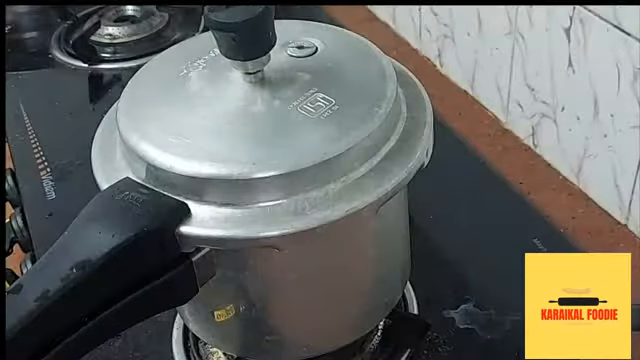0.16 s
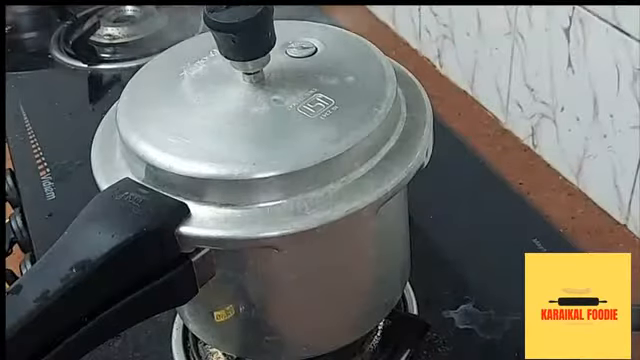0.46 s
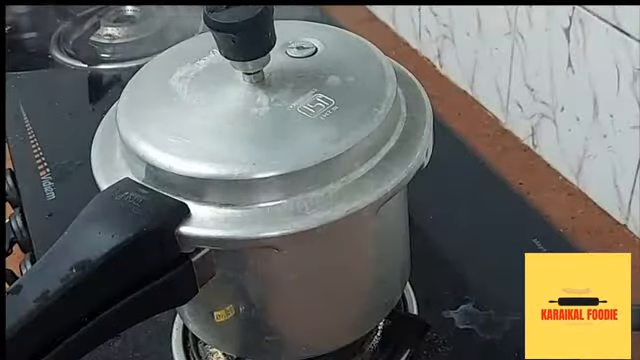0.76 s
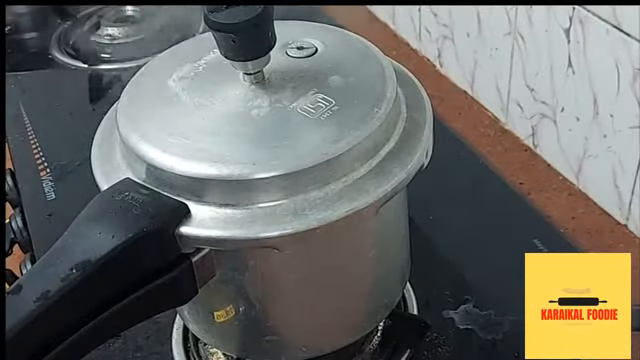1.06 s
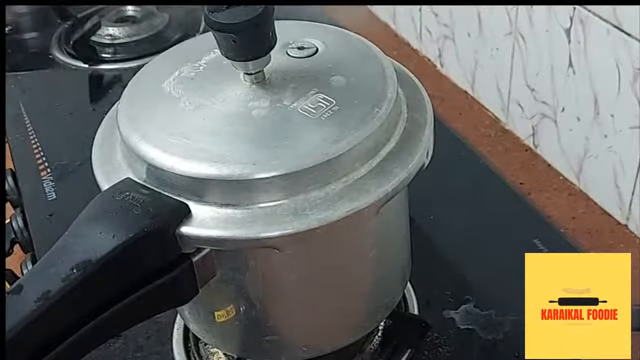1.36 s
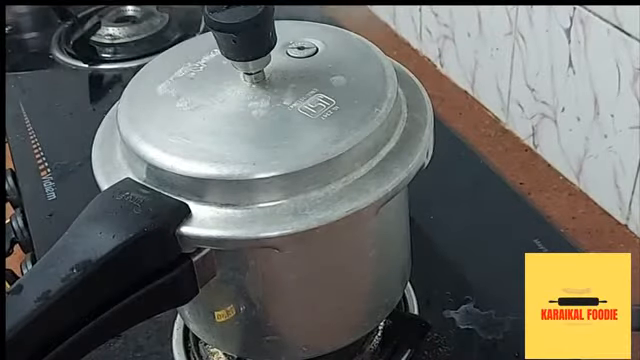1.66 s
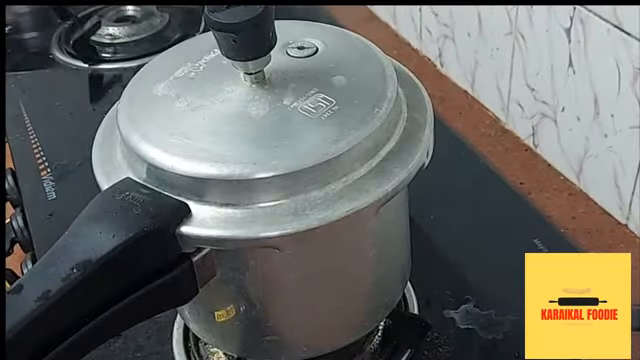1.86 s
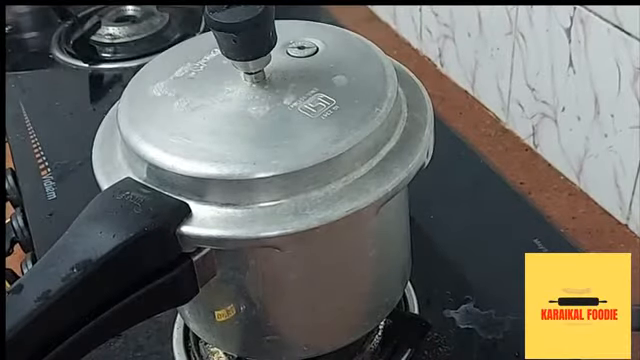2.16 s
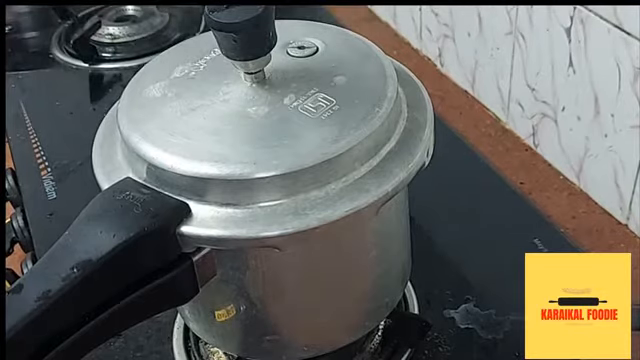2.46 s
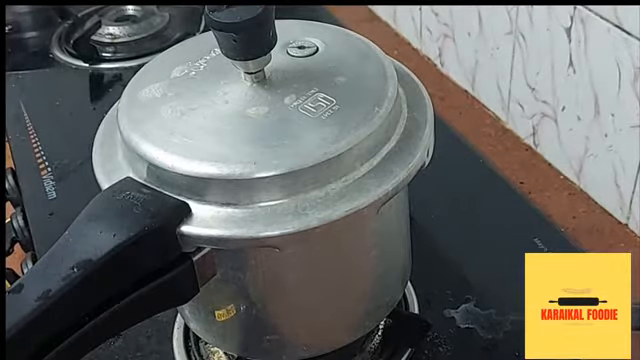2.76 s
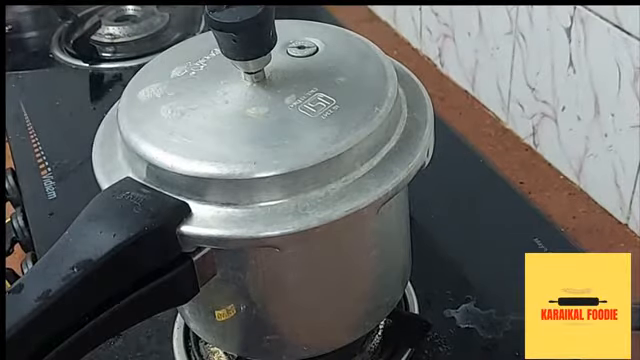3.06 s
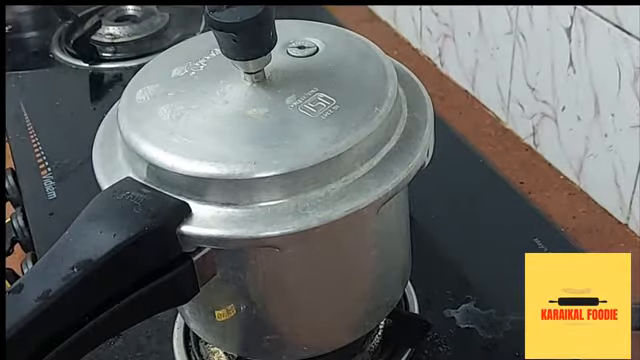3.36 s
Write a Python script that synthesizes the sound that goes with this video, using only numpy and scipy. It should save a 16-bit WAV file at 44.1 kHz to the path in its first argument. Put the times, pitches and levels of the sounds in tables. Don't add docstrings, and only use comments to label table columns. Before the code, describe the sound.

Pressure cooker steam release, heard close in stereo in a small tiled kitchen. A faint low hum vanishes as wet spits burst at 0-0.15 s. A strong rush peaks near 0.17 s, settling into a steady, bright, wide hiss until the end at about 3.5 s. Hard pops hit the right side from 0.2-0.8 s over low rumble; lighter pops, a thin high whistle and occasional soft puffs follow.

```python
import sys
import numpy as np
from scipy import signal
from scipy.fft import rfft, irfft
from scipy.io import wavfile
from scipy.ndimage import uniform_filter1d

SR = 44100
rng = np.random.default_rng(int(sys.argv[2]) if len(sys.argv) > 2 else 0)


def voltage_ratio(level):
    return 10 ** (np.asarray(level, float) / 20)


def to_wav(sig):
    pcm = np.clip(np.atleast_2d(sig), -1, 1) * 32767
    pcm = np.round(pcm).astype(np.int16)
    wavfile.write(sys.argv[1], SR, pcm.T)


N = 154350
T = np.arange(N) / SR
WIND_CUT_HZ, LOW_CUT_HZ = 320, 50


def evened(x):
    return x / np.sqrt(np.mean(x ** 2) + 1e-20)


def read(points, hz):
    f, value = np.transpose(points)
    return np.interp(np.log(hz + 1), np.log(f + 1), value)


def cut(x, hz, kind, order):
    return signal.sosfilt(signal.butter(order, hz, kind, fs=SR, output="sos"), x)


def drift(top_hz):
    return evened(cut(rng.standard_normal(N + SR), top_hz, "low", order=1)[SR:])


def window(start, rise, hold, fall):
    return np.interp(T, np.cumsum([start, rise, hold, fall]), [0, 1, 1, 0])


def hiss(*colours):
    # frequency in Hz, shared share of amplitude (0 to 1).
    likeness = [(300, .18), (1200, .1), (2500, .4), (5000, .42), (7500, .7), (8600, .3), (12000, .3),
                (16000, .2)]
    patch_db = 1.2
    echo_s, echo_turn, echo_share = .00182, .18, .5
    lag_s, phase = 0.00015, 6.91
    hz = np.fft.rfftfreq(512, 1 / SR)
    colour_db = sum(read(colour, hz) for colour in colours)[:, None]
    a, b, c, d, patches = rng.standard_normal((N // 128 + 5, len(hz), 5)).T
    patches = uniform_filter1d(patches, size=7, axis=0)
    patches = evened(uniform_filter1d(patches, size=16, axis=1))
    comb = 1 + echo_share * np.cos(2 * np.pi * (hz * echo_s + echo_turn))
    same = np.clip(read(likeness, hz) * comb, 0, 1)[:, None]
    lag = np.exp(1j * (phase - 2 * np.pi * hz * lag_s))[:, None]
    left = a + 1j * b
    right = same * left * lag + np.sqrt(1 - same ** 2) * (c + 1j * d)
    spectra = np.array([left, right]) * voltage_ratio(colour_db + patch_db * patches)
    return evened(signal.istft(spectra, nperseg=512, noverlap=384)[1][:, :N])


def hum():
    # frequency in Hz, bandwidth of the wavering in Hz, level in dB.
    hum_tones = [(55, 30, -58), (111, 30, -48), (198, 25, -42), (367, 60, -60)]
    # frequency in Hz, level in dB.
    room_air = [(60, -20), (200, -3), (500, -16), (1500, -19), (6000, -19), (16000, -33)]
    air_db, duck_db, duck_start_s, duck_fade_s = -46, -30, 0.115, 0.14
    tones = 0
    for hz, width, db in hum_tones:
        wobble = signal.lfilter([1], [1, -np.exp(-np.pi * width / SR)], rng.standard_normal(N + SR))[SR:]
        sine = np.sqrt(2) * np.sin(2 * np.pi * (hz * T + rng.random()))
        tones = tones + voltage_ratio(db) * (1 + .28 * evened(wobble)) * sine
    duck = voltage_ratio(duck_db * np.clip((T - duck_start_s) / duck_fade_s, 0, 1))
    return (tones + voltage_ratio(air_db) * hiss(room_air)) * duck * voltage_ratio([[-2.2], [2.2]])


def puffs():
    # time in seconds, frequency in Hz, left level in dB, right level in dB.
    puff_rows = [
        (2.02, 90, -36, -38),
        (2.455, 90, -38, -39),
        (2.807, 120, -38, -32),
        (2.83, 70, -37, -60),
        (3.155, 100, -41, -36),
        (3.318, 80, -36, -38),
        (3.395, 72, -32, -33),
    ]
    puff_s = .01
    total = 0
    for s, hz, left_db, right_db in puff_rows:
        swing = np.exp(-((T - s) / puff_s) ** 2) * np.sin(2 * np.pi * hz * (T - s))
        total = total + voltage_ratio([[left_db], [right_db]]) * swing
    return total


def gusts(rows):
    edge_s, lump_db = .01, 3
    level = np.sqrt(sum((voltage_ratio(db) * window(s, edge_s, length, edge_s)) ** 2 for s, length, db in rows))
    air = rng.standard_normal(N)
    share = np.interp(T, [.9, 2.4], [0, .5])
    wander = (1 - share) * cut(air, 85, "low", order=2) + share * cut(air, 190, "low", order=3)
    wander = wander * voltage_ratio(lump_db * drift(36))
    return level * evened(cut(wander, LOW_CUT_HZ, "high", order=4))


def steps(rows, sign):
    marks = np.zeros(N)
    for s, db in rows:
        marks[round(s * SR)] += sign * voltage_ratio(db)
    return marks


def popped(marks, low_hz, order):
    ringing = cut(np.cumsum(marks), low_hz, "high", order=order)
    return np.roll(cut(ringing, 3000, "low", order=2), -6)


def pops():
    # time in seconds, level in dB.
    pushes = [(0.2126, -12.6), (0.2141, -10.1), (0.2216, -17.9), (0.2304, -6.9), (0.2464, -6.8),
              (0.2482, -8.0), (0.2685, -13.9), (0.2749, -5.9), (0.2821, -26.0), (0.283, -12.9),
              (0.2923, -6.6), (0.3238, -4.1), (0.3264, -17.2), (0.3526, -15.1), (0.3534, -16.4),
              (0.3918, -1.1), (0.4245, -7.3), (0.4573, -0.4), (0.5256, -12.3), (0.5362, -26.0),
              (0.5816, -4.3), (0.5982, -8.3), (0.6159, -6.1), (0.632, -12.9), (0.6364, -19.7),
              (0.6557, -6.8), (0.7412, -13.1), (0.764, -3.5), (0.8164, -3.8)]
    # time in seconds, level in dB.
    pulls = [(0.2249, -11.5), (0.2404, -16.9), (0.2678, -3.0), (0.2774, -8.0), (0.3098, -12.0),
             (0.32, -7.2), (0.3432, -13.4), (0.3545, -12.7), (0.3902, -12.6), (0.3949, -10.1),
             (0.424, -14.4), (0.4268, -15.2), (0.4478, -11.8), (0.4553, -4.1), (0.5117, -7.5),
             (0.5629, -8.9), (0.5802, -8.9), (0.5821, -19.2), (0.6042, -7.7), (0.6168, -10.3),
             (0.6289, -11.3), (0.6389, -8.4), (0.6776, -7.7), (0.7306, -13.0), (0.7453, -8.7),
             (0.7502, -10.6), (0.7853, -11.7)]
    # time in seconds, level in dB.
    taps = [(.713, -17), (.808, -16), (.9166, -21), (.9324, -25), (.9833, -19), (1.0171, -21), (1.056, -19),
            (1.1006, -21), (1.1187, -24), (1.1484, -19), (1.1556, -25), (1.1699, -25), (1.2354, -22),
            (1.2467, -20), (1.2735, -26), (1.284, -21), (1.3023, -23), (1.3348, -19), (1.344, -24),
            (1.4204, -25), (1.4345, -25), (1.448, -20), (1.4581, -22), (1.4887, -20), (1.5329, -19),
            (1.5407, -23), (1.5723, -17), (1.6323, -18), (1.6507, -25), (1.6897, -22), (1.7535, -21),
            (1.7629, -26), (1.8395, -25), (1.8506, -22), (2.011, -24), (2.1428, -26), (2.3315, -25),
            (2.3648, -24), (2.8035, -19), (3.3063, -25), (3.3825, -23)]
    patter_per_s, patter_db, fade_db_per_s, spread_db = 240, -30, 3.5, 2.2
    snap_hz, snap_share = 500, .3
    excess = np.minimum(rng.exponential(1, (2, N)), 4)
    size = voltage_ratio(patter_db - fade_db_per_s * T + spread_db * excess)
    struck = (rng.random((2, N)) < patter_per_s / SR) * (T > .18)
    patter = size * rng.choice([-1., 1.], (2, N)) * struck * voltage_ratio([[0.5], [-1]])
    left = popped(patter[0], WIND_CUT_HZ, order=5)
    right = popped(patter[1] + steps(taps, -1.64), WIND_CUT_HZ, order=5)
    hard = popped(steps(pushes, 1) + steps(pulls, -1), LOW_CUT_HZ, order=5)
    return np.array([left, right + hard + snap_share * cut(hard, snap_hz, "high", order=1)])


def whistle():
    centre_hz, wander_hz, width_hz = 7580, 170, 150
    level_db, grow_db_per_s = -18, .6
    pitch_hz = centre_hz + wander_hz * evened(cut(drift(7), 11, "low", order=2))
    turn = np.exp(2j * np.pi * np.cumsum(pitch_hz) / SR)
    base = rng.standard_normal((3, N)) + 1j * rng.standard_normal((3, N))
    base = cut(base, width_hz / 2, "low", order=2)
    tone = evened(((base[:2] + 0.82 * base[2]) * turn).real)
    return voltage_ratio(level_db + grow_db_per_s * T + 2 * drift(3.3)) * tone


def sputter():
    # frequency in Hz, level in dB per Hz.
    gape_colour = [(400, -23), (900, 8), (1300, -1.5), (2500, 5), (3800, -35), (4200, -45), (8000, -32),
                   (16000, -41)]
    # frequency in Hz, level in dB per Hz.
    spit_colour = [(400, -24), (1000, -11), (2000, -2.5), (3000, 4), (3800, 7), (4200, -37), (8000, -22),
                   (16000, -30)]
    # start in seconds, level in dB.
    spit_rows = [
        (.029, -23.5),
        (.046, -19),
        (0.069, -16),
        (.094, -7.5),
        (.166, -24),
    ]
    spit_s, gape_db, lump_db = .01, -27, 2
    spits = sum(voltage_ratio(db) * (T > s) * np.exp(-abs(T - s) / spit_s) for s, db in spit_rows)
    gape = voltage_ratio(gape_db + lump_db * drift(29)) * window(.05, .07, .05, .05)
    return gape * hiss(gape_colour) + .5 * spits * hiss(spit_colour)


def coloured(x):
    # frequency in Hz, width in Hz, boost in dB.
    rings = [(3230, 790, 7.5), (7150, 580, 7.5), (7750, 870, 7.5), (7917, 250, 3)]
    # frequency in Hz, width in Hz, boost in dB.
    lid = [(2298, 40, 5), (2665, 70, 4.5), (2810, 120, -3), (2960, 80, 3.5), (3150, 50, 4.5),
           (3400, 140, 2.5), (3770, 130, 6), (5000, 200, -2), (5220, 250, 2.5), (5580, 170, -4.5),
           (5850, 160, 3), (6120, 150, -3.5), (8850, 350, -5)]
    # frequency in Hz, width in Hz, boost in dB.
    sheen = [(7595, 50, 3), (9250, 250, 2), (10400, 200, -2.5), (10722, 50, 4), (11015, 60, 4),
             (12635, 200, 2), (13150, 250, -1.5), (13750, 300, 1.5), (14300, 300, 1)]
    wall_db, wall_t60_s = -14, .2
    hz = np.fft.rfftfreq(N, 1 / SR)
    boost_db = 0
    for modes in (rings, lid, sheen):
        boost_db = boost_db + sum(db / (1 + (2 * (hz - f) / w) ** 2) for f, w, db in modes)
    x = irfft(rfft(x) * voltage_ratio(boost_db), N)
    t = np.arange(8000) / SR
    sparse = rng.standard_normal((2, len(t))) * (rng.random((2, len(t))) < .3)
    tail = sparse * voltage_ratio(-60 * t / wall_t60_s)
    tail *= voltage_ratio(wall_db) / np.linalg.norm(tail, axis=1, keepdims=True)
    return evened(x + signal.fftconvolve(x, tail, axes=1)[:, :N])


def steam():
    # time in seconds, level in dB.
    flow = [(0, -54), (.04, -33), (.053, -29), (.066, -33), (.105, -21), (.165, -12.5), (.25, -19.5),
            (.34, -17.5), (.39, -20), (.9, -19), (.94, -22), (1.6, -22.5), (1.85, -24), (2.3, -20.5),
            (2.42, -21), (2.62, -21), (3.2, -21), (3.5, -20)]
    # frequency in Hz, level in dB per Hz.
    jet_colour = [(200, -11), (500, -19), (1900, -19), (2250, -13), (3850, -11.5), (4150, -11), (6200, -13),
                  (9000, -11)]
    # frequency in Hz, boost in dB.
    top_air = [(9000, -0.5), (10500, 2.5), (12500, 4.5), (14200, 4), (15700, 2.5), (16200, -40)]
    # frequency in Hz, level in dB per Hz.
    wet_colour = [(200, -9), (500, 17.5), (1500, 6.5), (2500, 20), (5000, -46)]
    swell_db, flicker_db, wet_db, dry_db_per_s = .6, .7, -14, 5
    flow_db = np.interp(T, *np.transpose(flow)) + swell_db * drift(19) + flicker_db * drift(120)
    jet = coloured(hiss(jet_colour, top_air))
    valley = signal.sosfiltfilt(signal.butter(2, [4150, 5100], "band", fs=SR, output="sos"), jet)
    jet = jet - .35 * valley * window(0, .02, .15, .04)
    wet = voltage_ratio(wet_db - dry_db_per_s * T) * hiss(wet_colour)
    return cut(voltage_ratio(flow_db) * (jet + wet + whistle()) + sputter(), WIND_CUT_HZ, "high", order=3)


def starved(x):
    # start in seconds, length in seconds, low edge in Hz, high edge in Hz.
    empty_bands = [
        (.027, .025, 4780, 5050),
        (.05, .025, 4400, 5050),
        (.077, .023, 4050, 4500),
        (.124, .044, 4350, 5000),
        (.238, .024, 4150, 4400),
        (.31, .022, 4150, 4350),
        (.1, .14, 6150, 6350),
    ]
    hz, centre = np.fft.rfftfreq(N, 1 / SR), rfft(x.mean(0))
    lost = 0
    for s, length, low, high in empty_bands:
        band = irfft(centre * (hz > low) * (hz < high), N)
        lost = lost + window(s - .014, .004, length + .018, .004) * band
    return x - lost


def scene():
    # start in seconds, length in seconds, level in dB.
    left_gusts = [
        (.14, .08, -28),
        (.23, .7, -34),
        (.93, .13, -36),
        (1.06, .6, -34),
        (1.71, .07, -37),
        (1.83, .07, -37),
        (2.14, .06, -45),
        (2.28, .1, -40),
        (1.66, 1.84, -62),
    ]
    # start in seconds, length in seconds, level in dB.
    right_gusts = [
        (.2, .48, -27),
        (.72, .1, -28),
        (.875, .05, -32),
        (.93, .05, -39),
        (1.08, .16, -41),
        (1.56, .07, -42),
        (1.89, .31, -43),
        (2.25, .12, -42),
        (2.42, 1.08, -50),
        (.9, 1.1, -63),
    ]
    rumble = np.array([gusts(left_gusts), gusts(right_gusts)])
    return hum() + puffs() + rumble + pops() + steam()


def low_pass(x):
    return signal.sosfilt(signal.butter(12, 15745, fs=SR, output="sos"), x)


def record(dry):
    ceiling = .85
    held = ceiling * np.tanh(dry / ceiling) * .7 + dry * .3
    return low_pass(starved(held))


dry = scene()
out = record(dry)
to_wav(out)
```